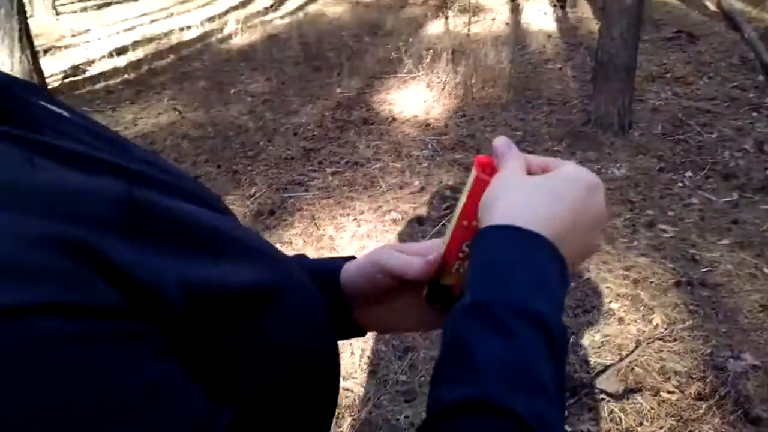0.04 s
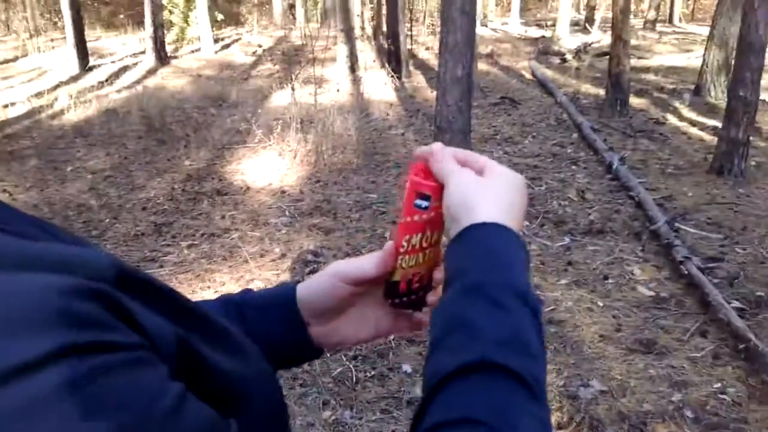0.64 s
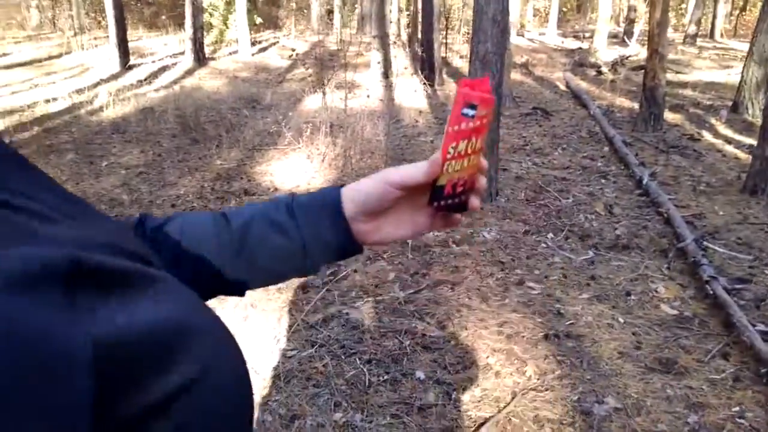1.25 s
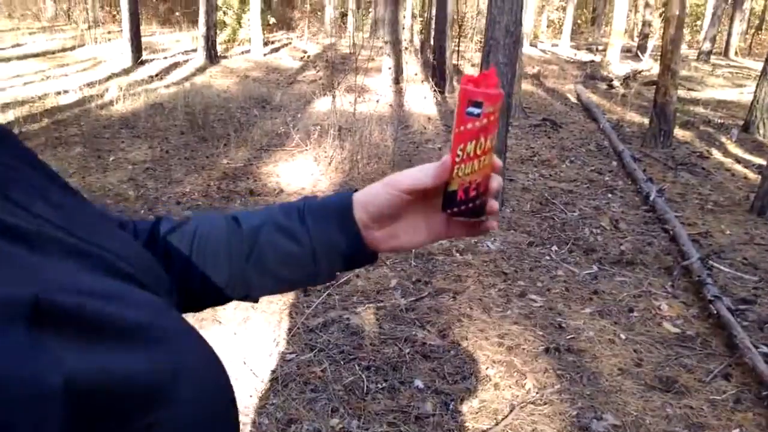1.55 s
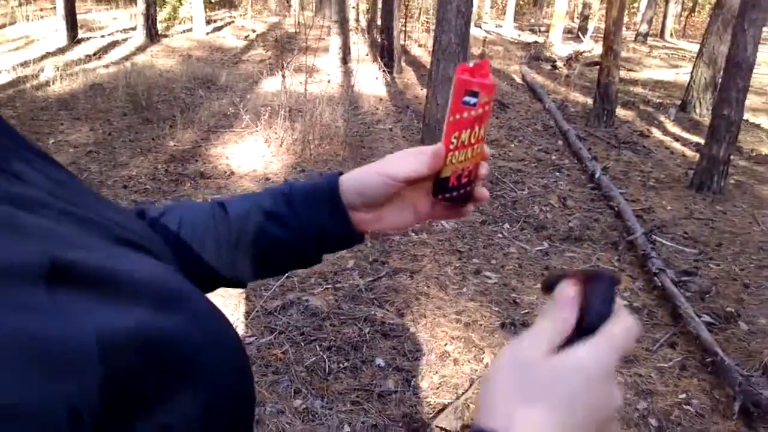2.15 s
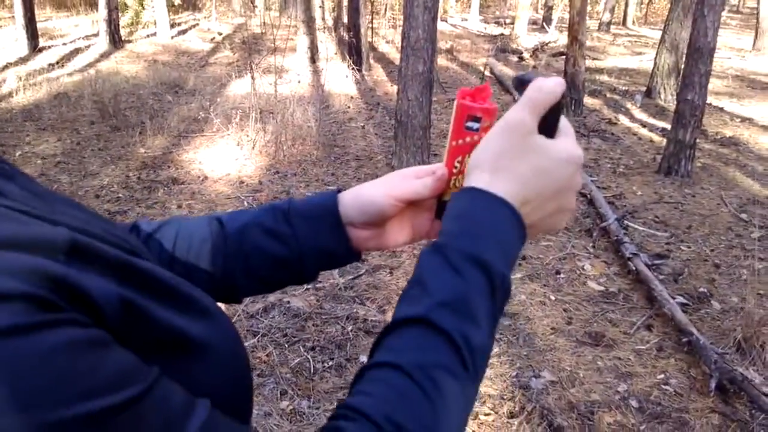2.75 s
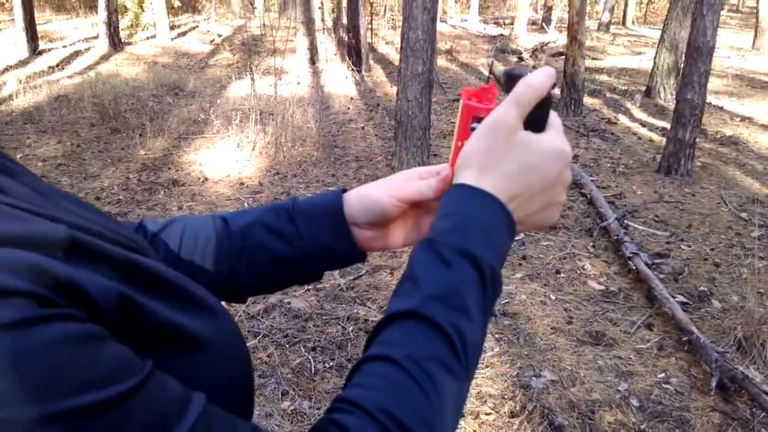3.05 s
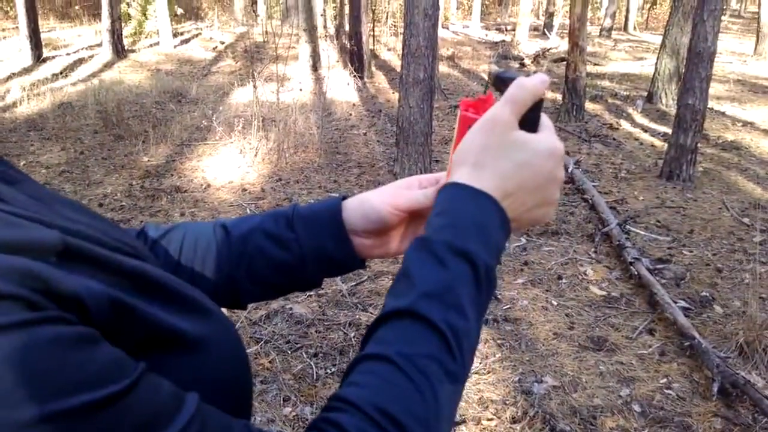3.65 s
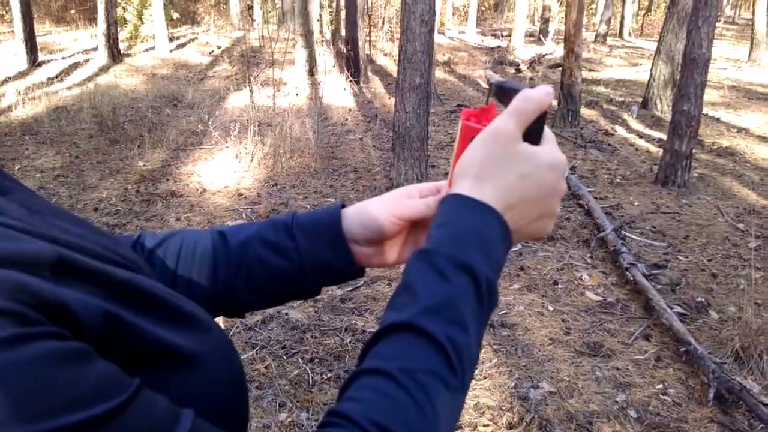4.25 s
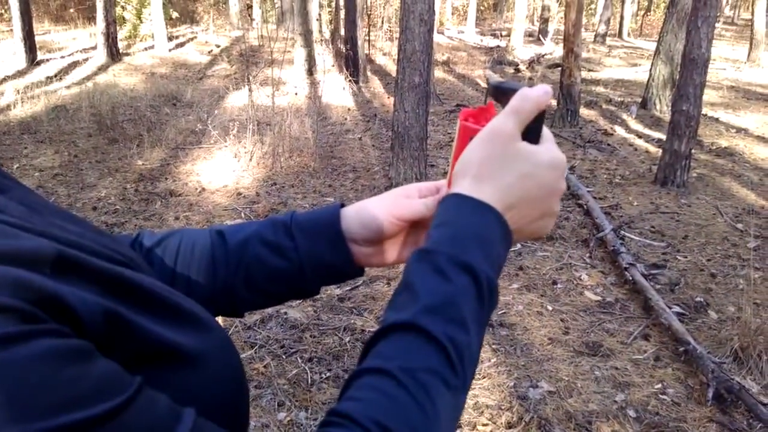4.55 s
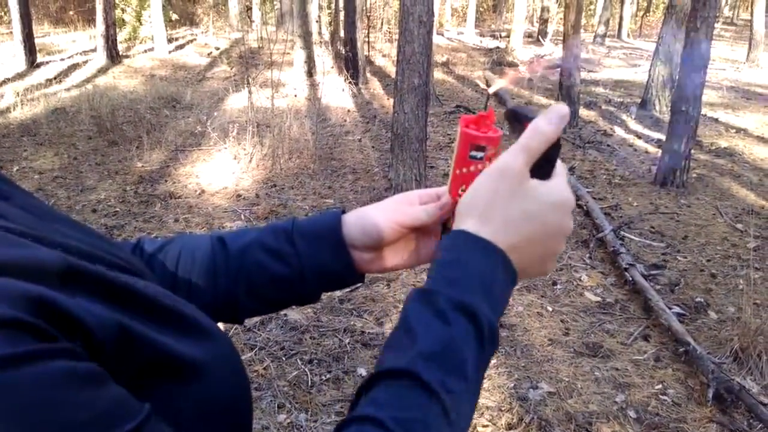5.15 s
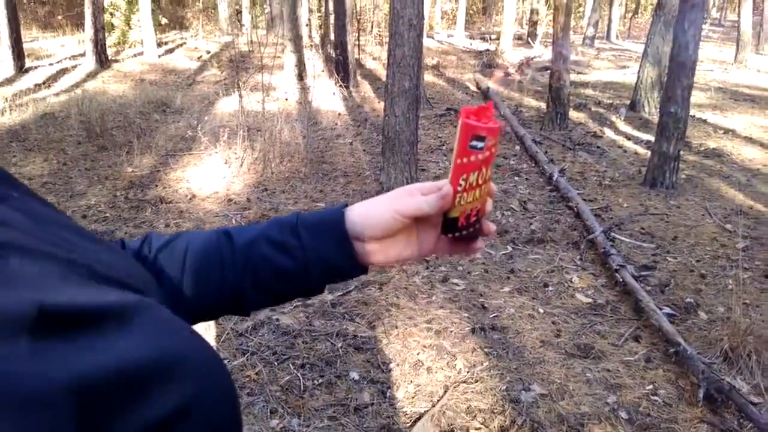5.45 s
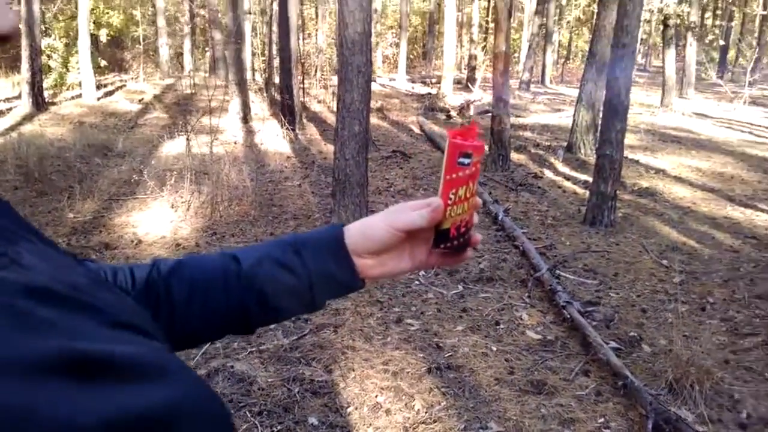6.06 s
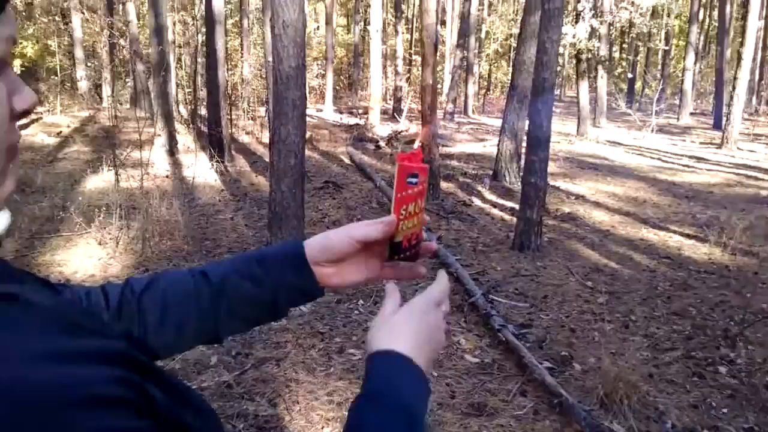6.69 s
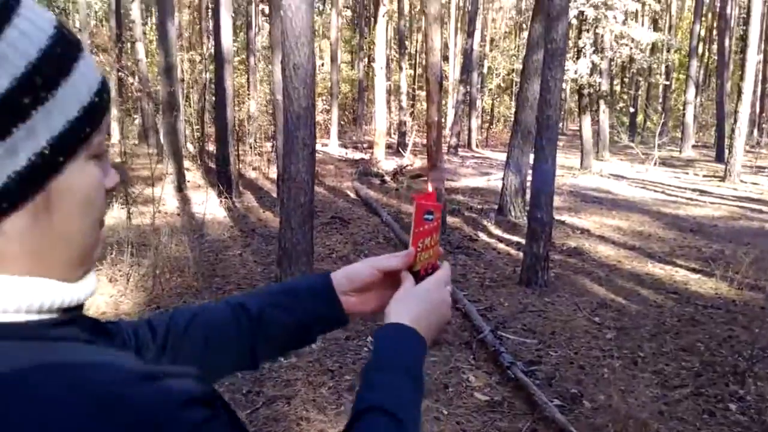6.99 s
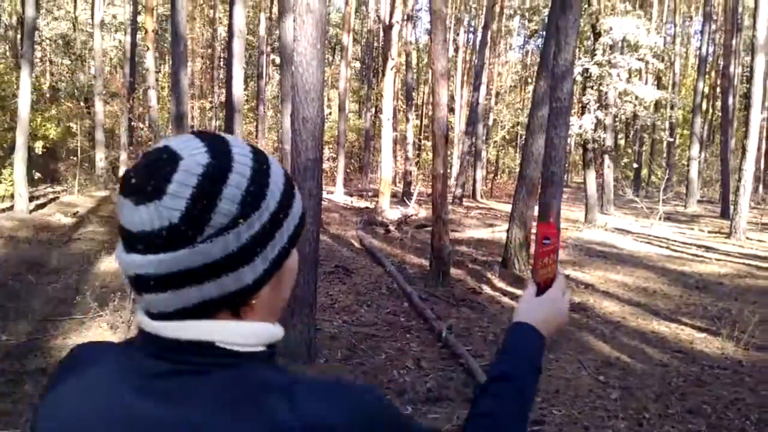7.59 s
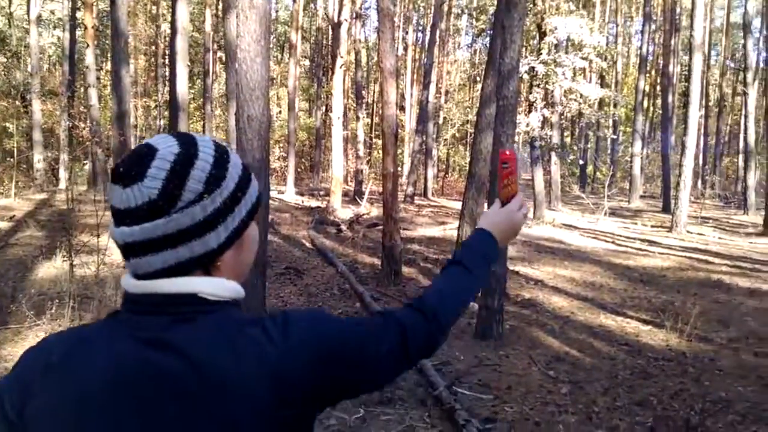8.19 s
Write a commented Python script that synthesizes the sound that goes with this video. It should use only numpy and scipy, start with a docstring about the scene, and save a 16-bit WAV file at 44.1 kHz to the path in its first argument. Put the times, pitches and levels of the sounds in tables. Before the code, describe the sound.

A smoke tube is lit close to the microphone among quiet trees. First come jacket rustle, wrapper crinkles, finger taps on cardboard and low thuds of wind. Two loud lighter clicks follow, then a faint gas flame and a few small spits from the fuse. The tube ignites into a steady rushing hiss, slightly to the right, which shifts in tone and weakens somewhat near the end.

```python
"""Jacket sleeves swish, a wrapper crackles and air buffets the microphone as a cardboard smoke tube
is unwrapped in a quiet pine forest. A piezo lighter snaps twice, its hammer ringing on impact, and
its jet flame blows on the fuse. The tube catches: turbulent gas roars and hisses from the nozzle,
changing colour as it is lifted away. The camera widens its two microphone ports into stereo; its
limiter ducks at the first snap and recovers slowly."""
import sys
import numpy as np
from scipy import signal
from scipy.fft import rfft, irfft, next_fast_len
from scipy.io import wavfile
from scipy.ndimage import uniform_filter1d, minimum_filter1d, map_coordinates

SR = 44100
rng = np.random.default_rng(int(sys.argv[2]) if len(sys.argv) > 2 else 0)


def unload_audio(sound):
    """Save the sound as a 16-bit wav file, at the path given as the first command line argument."""
    columns = np.transpose(np.atleast_2d(sound))
    # keep every value between -1 and 1, then stretch to whole-number steps
    steps = np.round(np.clip(columns, -1, 1) * 32767)
    wavfile.write(sys.argv[1], SR, steps.astype(np.int16))


N = 367353

# Noise spectra. Each row: frequency in Hz, relative spectral density in dB.
FOREST_AIR = [(30, 12.5), (100, -9.5), (250, 4.5), (600, 1), (1000, -7.5), (1500, -13), (2700, -17.5),
              (5000, -16.5), (9000, -19.5), (15500, -21)]
EDDIES = [(15, -7.5), (45, 5), (90, -0.5), (150, -10.5), (250, -20.5), (450, -30.5), (1000, -67.5),
          (3000, -115.5)]
RUB = [(150, 4.5), (400, 6), (750, 4.5), (1200, -2), (1900, -4), (2700, -13.5), (5000, -16.5),
       (10000, -28.5)]  # wrapper and cardboard
NYLON = [(1500, -9.5), (3000, -13.5), (4500, -8), (6500, -7), (8000, -6), (9800, -0.5), (12000, -8),
         (15500, -7)]
CRACK = [(300, -48), (1500, 5), (3000, -12.5), (6000, 2), (10000, 6.5), (15500, -5)]
RATTLE = [(500, -42.5), (1200, -26), (2100, -6.5), (3400, -16.5), (4800, -10), (6200, 0.5), (8000, -4.5),
          (10000, 1.5), (15500, -10.5)]  # the tail of a lighter snap
FLAME_JET = [(100, -20), (260, 4), (600, 8.5), (900, -1), (1300, 5), (1850, 2.5), (2700, -5), (5000, -48.5),
             (10000, -13), (16000, -17.5)]
ROAR = [(100, -8.5), (260, 1), (600, 1.5), (900, 2.5), (1300, 1.5), (1850, 0), (2600, 0.5), (3400, -9),
        (4500, -4.5), (8000, -51)]  # the low part of the smoke jet
HISS = [(2000, -16.5), (3500, -6), (4900, -7), (6300, 0), (8000, 1), (10000, 1.5), (12000, 0.5),
        (13500, -0.5), (15600, -1)]  # its treble, and the fuse
NOZZLE_BEAM = [(3500, -25.5), (4700, -13.5), (6300, -12), (8000, -16.5), (9300, -4.5), (10400, 0),
               (11900, -4.5), (13000, -10), (14700, -12), (17000, -23)]

# Coherence of diffuse sound at the two ports. Each row: frequency in Hz, correlation from 0 to 1.
COHERENCE = [(150, 0.95), (600, 0.3), (1100, 0), (1600, 0.11), (4000, 0.14)]
# Acoustic shadow of the camera body on the left port. Each row: frequency in Hz, gain in dB.
BODY_SHADOW = [(500, 0), (1000, -3), (1900, -4), (3300, -3.5), (6500, -9), (9000, -14), (10700, -17),
               (14000, -15)]
# Long waves creep round the camera and arrive later. Each row: frequency in Hz, extra lag in ms.
CREEP_LAG = [(3500, 0.03), (6500, 0)]
# Stereo widening. Each row: frequency in Hz, share of the opposite port subtracted.
CROSSFEED = [(70, 0.63), (300, 0.71), (1400, 0.39), (2700, 0.94), (4000, 0.85), (5100, 0.46), (7000, 0.2),
             (11000, 0.096), (15000, 0.15)]

# A far hum comes and goes. Each row: time in seconds, level in dB.
HUM_LEVEL = [(0, -58.5), (3.4, -63.5), (4.2, -53.5), (5.0, -53), (8.33, -56)]
# Light draught between gusts. Each row: time in seconds, relative level in dB.
DRAUGHT_LEVEL = [(0, -51), (0.95, -49.5), (1.2, -54.5), (2.0, -53.5), (2.6, -63), (3.4, -65), (4.9, -66),
                 (6.2, -55), (8.33, -51)]
# Gusts on the microphone. Each row: middle in seconds, half length in seconds, relative level in dB.
GUSTS = [(0.218, 0.021, -41), (0.363, 0.031, -39.5), (0.528, 0.15, -36), (0.773, 0.017, -45),
         (0.885, 0.035, -36), (1.013, 0.03, -37), (1.363, 0.025, -47), (1.696, 0.044, -46.5),
         (1.898, 0.022, -39), (1.993, 0.017, -39), (2.19, 0.045, -38), (2.276, 0.028, -33),
         (2.839, 0.06, -42.5), (3.916, 0.058, -50), (4.621, 0.07, -51.5), (5.248, 0.027, -41.5),
         (5.432, 0.1, -44.5), (5.716, 0.16, -45), (6.61, 0.075, -38.5)]
# Thuds of air on the left port. Each row: time in seconds, peak in dB, half length in ms.
AIR_THUDS = [(0.36, -14.5, 1), (0.43, -13, 2.8), (0.486, -10.5, 0.98), (0.5136, -10.5, 0.62),
             (0.525, -7, 1.24), (0.564, -10, 1.43), (0.597, -9.5, 0.9), (0.633, -9, 1.85),
             (0.656, -16, 1.15), (0.778, -19, 1.34), (0.871, -21, 1.8), (0.895, -21.5, 1.4),
             (1.027, -14, 1.43), (1.586, -15.5, 1.28), (1.683, -20, 1.6), (1.809, -21, 3.2),
             (1.894, -16.5, 2.2), (1.938, -20, 2.3), (2.007, -20.5, 1.75), (2.28, -23, 2.4),
             (6.993, -18.5, 0.67)]
# The jacket rustles until the hands hold still.
# Each row: time in seconds, relative levels of rub and swish in dB.
JACKET_RUSTLE = [(0, -59.5, -69), (0.9, -57.5, -60.5), (1.4, -59, -57), (2.45, -55, -56.5),
                 (2.65, -55, -62), (2.89, -67.5, -71), (3.4, -66.5, -75)]
# Strokes of sleeve and wrapper.
# Each row: start and length in seconds, relative levels of rub and swish in dB.
ARM_STROKES = [(-0.02, 0.16, -43.5, -43), (0.146, 0.25, -43.5, -49.5), (0.259, 0.089, -40.5, -46),
               (0.42, 0.33, -49.5, -47.5), (0.703, 0.2, -65, -55), (1.003, 0.12, -62, -51),
               (1.071, 0.052, -40.5, -54), (1.154, 0.054, -41.5, -57.5), (1.226, 0.15, -50.5, -52.5),
               (1.419, 0.33, -51.5, -46), (1.856, 0.21, -48.5, -45.5), (2.17, 0.24, -49, -56)]
# Fingers on cardboard or lighter. Each row: start in seconds, level in dB, pitch in Hz.
FINGER_TAPS = [(0.111, -28, 856), (0.151, -30.5, 1920), (0.17, -27, 910), (0.29, -27.5, 760),
               (0.322, -27, 537), (0.436, -32, 795), (0.558, -23.5, 1600), (1.101, -33, 765),
               (1.177, -28.5, 770), (1.193, -26.5, 720), (1.254, -25.5, 1050), (1.474, -23.5, 1140),
               (1.972, -27.5, 840), (2.36, -33.5, 810), (2.532, -35.5, 716), (2.554, -35, 715),
               (2.661, -32.5, 2090), (2.981, -41, 890), (3.359, -45, 1900), (6.992, -29, 513),
               (7.536, -22, 309), (7.544, -22, 1135)]
# Cracks of wrapper, trigger and burning charge. Each row: start in seconds, relative level in dB.
TICKS = [(0.042, -27), (0.087, -24.5), (0.113, -22.5), (0.146, -26), (0.217, -32), (0.2909, -14.5),
         (0.3213, -24), (0.3297, -20.5), (0.44, -31), (0.5567, -30), (0.651, -26.5), (0.711, -37),
         (0.833, -42), (1.0163, -36.5), (1.263, -31), (1.279, -20.5), (1.363, -34), (1.648, -35),
         (2.2208, -38), (2.38, -30), (2.4388, -24), (2.87, -30.5), (2.96, -38), (2.981, -38), (3.264, -36),
         (3.359, -46), (7.873, -23.5), (8.3049, -19.5)]
# Lighter strike, trigger release, second strike. Each row: start in seconds, peak of the ring in dB,
# then the snap's dull body and the crunch of the spring in dB relative to it.
LIGHTER_SNAPS = [(2.9108, 21, -19, -27), (3.2660, -7, -36, -9), (3.4479, 15, -58, -22)]
# Damped modes. Each row: frequency in Hz, relative level in dB, time to decay by 60 dB in seconds.
HAMMER_MODES = [(1400, -40, 0.005), (2150, -33, 0.009), (3700, -33, 0.004), (6100, -16, 0.005),
                (7300, -15, 0.005), (10350, 0, 0.0036), (11900, -4, 0.003), (13200, -13, 0.003),
                (14800, -15, 0.003)]  # the ring of the lighter's hammer
SNAP_BODY_MODES = [(350, -8, 0.004), (690, -2, 0.003), (1300, -4, 0.003), (2970, -8, 0.005),
                   (3900, -9, 0.004)]  # the dull low and mid crunch of a snap loud enough to overload
# The lighter's gas jet. Each row: time in seconds, level in dB.
FLAME_LEVEL = [(3.43, -79), (3.48, -56), (3.9, -58.5), (4.35, -53.5), (4.7, -56), (4.9, -50.5),
               (5.1, -55.5), (5.3, -44)]
# Soft spits of the fuse. Each row: start in seconds, level in dB.
FUSE_SPITS = [(4.0, -50), (4.366, -51), (4.381, -44), (4.815, -52), (4.863, -46), (4.881, -48.5),
              (4.924, -45), (4.936, -51), (4.963, -48)]
# The tube catches, surges and recedes. Each row: time in seconds, relative roar and hiss in dB.
BURN_LEVELS = [(5.045, -68, -55), (5.1, -49, -42.5), (5.25, -38.5, -35), (5.34, -42.5, -32.5),
               (5.37, -38.5, -32), (5.56, -41, -26.5), (6.1, -39.5, -26), (6.24, -45.5, -33.5),
               (6.35, -37, -27.5), (6.37, -41.5, -23.5), (6.41, -40.5, -28), (6.6, -41, -27.5),
               (6.63, -41.5, -32), (6.77, -41, -28.5), (6.97, -40.5, -34), (7.11, -40.5, -30),
               (7.15, -43, -34), (7.26, -45, -36.5), (7.64, -40.5, -29.5), (7.66, -44.5, -35),
               (7.78, -46, -31.5), (7.84, -51.5, -39), (7.92, -45, -33), (8.15, -48.5, -39),
               (8.28, -49, -41)]
# Lumps of the charge flare up. Each row: start in seconds, change of the hiss in dB.
FLARES = [(5.322, 3), (5.366, 4), (5.438, 3.5), (5.625, 2), (5.778, 0), (6.51, -1.5), (6.795, 0),
          (7.075, 0.5), (7.873, 1), (7.934, 2), (8.304, 9)]
# The moving tube. Each row: time in seconds, lag of the left port in ms, lag of the arm's echo in ms,
# gain of that echo in dB, gain of the nozzle's beam in dB, its pitch ratio, left treble gain in dB.
TUBE_POSE = [(5.1, 0.035, .58, -20, -4, 1.02, 0), (5.4, 0.044, 0.59, -14, 0.5, 1.02, 0),
             (5.75, 0.049, 0.59, -8.5, 3, 1, -1.5), (6.1, 0.049, 0.57, -12, -1, 1.02, -2),
             (6.35, 0.033, 0.54, -9, 3.5, 1.0, -3.5), (6.6, 0.016, 0.56, -10, 6, 0.96, -0.5),
             (7.0, 0.023, 0.48, -18, 5, 1.03, -1.5), (7.3, 0.053, 0.47, -15, 5, 1.1, -1.5),
             (7.65, 0.086, 0.51, -7, -18, 1.1, -4), (8.33, 0.086, 0.5, -8, -8, 0.94, -6)]
# Spectral hollows and ridges that glide as the tube moves.
# Each row: start and end in seconds, first and last centre in Hz, width in Hz, gain in dB.
COLOUR_SWEEPS = [(4.9, 7.5, 870, 980, 75, -8), (4.9, 7.7, 610, 660, 70, 2.5),
                 (4.9, 6.4, 3130, 3680, 110, -14), (6.15, 7.5, 3600, 4520, 140, -13),
                 (4.9, 5.95, 4230, 4480, 130, -12), (7.9, 8.5, 4650, 4250, 130, -5),
                 (4.95, 6.1, 5300, 5600, 300, 4), (6.2, 7.45, 5750, 7400, 240, 6),
                 (4.95, 7.3, 1760, 1900, 100, 2.5), (4.9, 7.5, 7950, 8450, 320, -5),
                 (4.9, 7.0, 12850, 13150, 380, -4)]


def amp(db):
    """Amplitude grows tenfold for every 20 dB."""
    return 10 ** (np.asarray(db) / 20)


def unit(x):
    """Normalisation to an rms of 1."""
    return x / np.sqrt(np.mean(x ** 2) + 1e-20)


def along(points, hz):
    """Interpolation of (Hz, value) points on a logarithmic frequency axis."""
    freqs, values = np.transpose(points)
    return np.interp(np.log(hz + 1), np.log(freqs + 1), values)


def curves(rows):
    """Linear interpolation in time: one value per sample for each column after the first."""
    times, *columns = np.transpose(rows)
    return [np.interp(np.arange(N) / SR, times, column) for column in columns]


def during(rows, fade_s=0.02):
    """A time window: 1 over the span of a table, fading to 0 outside it."""
    t = np.arange(N) / SR
    return np.clip(1 + np.minimum(t - rows[0][0], rows[-1][0] - t) / fade_s, 0, 1)


def swell(start, length, attack_s, release_s):
    """An envelope with linear attack, a hold and exponential decay."""
    t = np.arange(N) / SR - start
    return np.clip(t / attack_s, 0, 1) * np.exp(-np.maximum(t - length, 0) / release_s)


def wobble(rate):
    """Random modulation: a smooth curve through rate knots a second."""
    knots = rng.standard_normal(int(N * rate / SR) + 4)
    return map_coordinates(knots, [np.arange(N) * rate / SR])


def add(track, start, sound):
    """Superposition of a short sound on a track, from start in seconds."""
    part = track[round(start * SR):][:len(sound)]
    part += sound[:len(part)]


def delayed(x, ms):
    """A fixed or gliding delay, by interpolation between samples."""
    return map_coordinates(x, [np.arange(N) - ms * SR / 1000])


def filtered(x, response):
    """Linear filtering: the spectrum is multiplied by a complex frequency response."""
    size = next_fast_len(N + 8192)
    return irfft(rfft(x, size) * response(np.fft.rfftfreq(size, 1 / SR)), size)[..., :N]


def coloured(x, spectrum):
    """Spectral shaping by a curve of (Hz, dB) points."""
    return filtered(x, lambda hz: amp(along(spectrum, hz)))


def dulled(x, edge_hz):
    """Low-pass filtering: the treble rolls off above the edge."""
    return filtered(x, lambda hz: 1 / (1 + (hz / edge_hz) ** 4))


def rush(spectrum):
    """Coloured Gaussian noise of rms 1."""
    return unit(coloured(rng.standard_normal(N), spectrum))


def crackle(spectrum, rate, spread_db):
    """Shot noise of rms 1: impulses of scattered size, on average rate a second."""
    size = amp(spread_db * np.minimum(rng.exponential(size=N), 4))
    sign = np.sign(rng.standard_normal(N))
    occurs = rng.random(N) < rate / SR
    return unit(coloured(size * sign * occurs, spectrum))


def ringing(modes, t):
    """Free vibration: damped modes of alternating sign, struck at t = 0."""
    return sum((-1) ** k * amp(db - 60 * t / t60) * np.cos(2 * np.pi * hz * t)
               for k, (hz, db, t60) in enumerate(modes))


def diffuse(spectrum):
    """A diffuse field is coherent at two nearby ports only at long wavelengths."""
    angle = lambda hz: np.arccos(np.clip(along(COHERENCE, hz), -1, 1)) / 2
    shape = lambda hz: amp(along(spectrum, hz)) * [np.cos(angle(hz)), np.sin(angle(hz))]
    mid, side = filtered(rng.standard_normal((2, N)), shape)
    return unit(np.array([mid + side, mid - side]))


def from_right(x, lag_ms):
    """Diffraction round the camera: sound from the right reaches the left port late and shaded."""
    creep = lambda hz: np.exp(-2j * np.pi * hz * along(CREEP_LAG, hz) / 1000)
    shaded = filtered(x, lambda hz: amp(along(BODY_SHADOW, hz)) * creep(hz))
    return np.array([delayed(shaded, lag_ms), x])


def forest(air_db=-54, hum_hz=113, waver_db=2):
    """Air in the trees forms a diffuse field; a far hum wavers in amplitude and phase."""
    t = np.arange(N) / SR
    hum_gain = amp(curves(HUM_LEVEL)[0] + waver_db * wobble(6))
    hum = hum_gain * np.sin(2 * np.pi * hum_hz * t + wobble(7))
    return amp(air_db + 1.1 * wobble(1)) * diffuse(FOREST_AIR) + hum


def buffeting(gust_db=13.5, draught_db=14, drift_db=3, lump_db=4):
    """Turbulent pressure is local: eddies press on each port separately, the sharpest as thuds."""
    t = np.arange(N) / SR
    gusts = sum(amp(db + gust_db) * np.exp(-((t - middle) / half) ** 2) for middle, half, db in GUSTS)
    draught = amp(curves(DRAUGHT_LEVEL)[0] + draught_db + drift_db * wobble(7.5))
    eddies = np.array([unit(rush(EDDIES) * amp(lump_db * wobble(45))) for port in range(2)])
    thuds = np.zeros(N)
    for middle, db, half_ms in AIR_THUDS:
        u = np.clip((t - middle) * 1000 / half_ms, -8, 8)
        thuds -= amp(db) * u * np.exp((1 - u ** 2) / 2)  # a push, then suction
    return np.hypot(gusts, draught) * eddies + np.array([thuds, np.zeros(N)])


def arm_motion(sag_db_per_s=14):
    """Incoherent sources add in power: strokes and faint rustle give the gains of rub and swish."""
    t = np.arange(N) / SR
    power = (amp(curves(JACKET_RUSTLE)) * during(JACKET_RUSTLE)) ** 2
    for start, length, rub_db, swish_db in ARM_STROKES:
        slowing = amp(-sag_db_per_s * np.clip(t - start, 0, length))
        speed = swell(start, length, attack_s=0.026, release_s=0.036) * slowing
        power += (amp([[rub_db], [swish_db]]) * speed) ** 2
    return np.sqrt(power)


def sleeves(rub_db=-4, grit_db=-3, swish_db=4, crisp_db=-1, scatter_db=-4, crinkle_db=-7.5):
    """Friction noise: nylon swishes and crackles; the rubbed wrapper adds grain and stray crinkles."""
    rub, swish = arm_motion()
    unevenness = amp(1.7 * wobble(55))
    grit = amp(grit_db) * crackle(RUB, rate=300, spread_db=1)
    crinkles = amp(crinkle_db) * crackle(CRACK, rate=110, spread_db=5)
    nylon = amp(swish_db) * rush(NYLON) + amp(crisp_db) * crackle(NYLON, rate=480, spread_db=7.5)
    near = from_right(rub * (grit + crinkles) + swish * unevenness * nylon, lag_ms=0.053)
    around = rub * amp(rub_db) * diffuse(RUB) + swish * amp(scatter_db) * diffuse(NYLON)
    return near + unevenness * around


def taps_and_ticks(tap_t60=0.018, scuff_db=-4, tick_db=8, tick_t60=0.0073):
    """Impulsive excitation: taps ring the damped cardboard with a scuff; ticks are bright cracks."""
    rings, scuffs, ticks = np.zeros((3, N))
    t = np.arange(SR // 12) / SR
    for start, db, hz in FINGER_TAPS:
        decay = amp(db - 60 * t / tap_t60)
        add(rings, start, decay * np.sin(2 * np.pi * hz * t))
        add(scuffs, start, decay * amp(scuff_db))
    for start, db in TICKS:
        add(ticks, start, amp(db + tick_db - 60 * t / tick_t60) / 2)
    return from_right(rings + scuffs * rush(RUB) + ticks * rush(CRACK), lag_ms=0.046)


def lighter(rattle_db=-38, rattle_t60=0.029, crunch_t60=0.011, echo_db=-65, echo_t60=0.46):
    """Impact excites the hammer's modes; the spring crunches, and ground and trunks reflect faintly."""
    snaps, tails = np.zeros((2, N))
    t = np.arange(SR // 4) / SR
    # so small a hammer radiates no bass
    highpass = signal.butter(6, 1200, "highpass", fs=SR, output="sos")
    hammer = signal.sosfilt(highpass, ringing(HAMMER_MODES, t))
    hammer /= np.abs(hammer).max()
    rattle = amp(rattle_db - 60 * t / rattle_t60)
    echo = amp(echo_db - 60 * t / echo_t60)
    for start, db, body_db, crunch_db in LIGHTER_SNAPS:
        crunch = amp(crunch_db - 60 * t / crunch_t60)
        add(snaps, start, amp(db) * (hammer + amp(body_db) * ringing(SNAP_BODY_MODES, t)))
        add(tails, start, amp(db) * (rattle + crunch + echo))
    return from_right(snaps + tails * rush(RATTLE), lag_ms=0.034)


def flame():
    """Jet noise: the lighter's gas blows softly on the fuse."""
    gain = amp(curves(FLAME_LEVEL)[0] + 0.36 * wobble(7.4)) * during(FLAME_LEVEL)
    return from_right(gain * rush(FLAME_JET), lag_ms=0.052)


def fuse(sputter_from_s=4.81, sputter_db=-60, spit_t60=0.03, singe_db=-70):
    """Combustion as shot noise: the fuse crackles in the flame, spits softly and sputters finely."""
    sputter_gain = amp(sputter_db) * swell(sputter_from_s, 0.092, attack_s=0.02, release_s=0.017)
    t = np.arange(SR // 10) / SR
    for start, db in FUSE_SPITS:
        add(sputter_gain, start, amp(db - 60 * t / spit_t60))
    lit_s = FLAME_LEVEL[1][0]
    singe_gain = amp(singe_db) * swell(lit_s, sputter_from_s - lit_s, attack_s=1.16, release_s=0.3)
    singe = singe_gain * crackle(HISS, rate=70, spread_db=4.5)
    sputter = sputter_gain * crackle(HISS, rate=5000, spread_db=6.5)
    return from_right(singe + sputter, lag_ms=0.035)


def phasing(x, fade_s=0.17):
    """Time-varying filtering: narrow hollows and ridges glide through the sound as the tube moves."""
    hz, t, spectra = signal.stft(x, SR, nperseg=1024)
    gain_db = 0
    for start, end, from_hz, to_hz, width_hz, db in COLOUR_SWEEPS:
        centre_hz = np.interp(t, [start, end], [from_hz, to_hz])
        presence = np.clip(np.minimum(t - start, end - t) / fade_s, 0, 1)
        gain_db += db * presence * np.exp(-((hz[:, None] - centre_hz) / width_hz) ** 2 / 2)
    return signal.istft(spectra * amp(gain_db), SR, nperseg=1024)[1][:, :N]


def smoke_tube(surge_db=0.8, sputter_db=1.07, flutter_db=0.65, spit_db=-10,
               roar_gain_db=2.5, hiss_gain_db=4, scatter_roar_db=-5, scatter_hiss_db=-15):
    """Turbulent jet noise: gas rushes from the nozzle; the grainy charge makes it surge and spit."""
    roar_db, hiss_db = curves(BURN_LEVELS) + surge_db * wobble(13)
    lag_ms, echo_ms, echo_db, beam_db, beam_ratio, left_treble_db = curves(TUBE_POSE)
    flare_db = sum(db * swell(start, 0.0027, attack_s=0.002, release_s=0.018) for start, db in FLARES)
    sputter = amp(flare_db + sputter_db * wobble(45) + flutter_db * wobble(260))
    fizz = rush(HISS) + amp(spit_db) * crackle(HISS, rate=1800, spread_db=9)
    # directivity: the bright beam shifts in pitch and strength as the nozzle turns
    facing = amp(beam_db)
    beam = map_coordinates(rush(NOZZLE_BEAM), [np.cumsum(beam_ratio)], mode="mirror")
    hiss = sputter * amp(hiss_db + hiss_gain_db) * (fizz + facing * beam) / np.hypot(1, facing)
    roar = amp(roar_db + roar_gain_db + 1.2 * wobble(35)) * rush(ROAR)
    jet = hiss + roar
    # interference with a dull echo off the arm combs the spectrum
    arm_echo = dulled(amp(echo_db) * delayed(jet, echo_ms), edge_hz=6400)
    left, right = from_right(jet + arm_echo, lag_ms)
    # lifted to the right, the tube hides further behind the camera body
    left_treble = left - dulled(left, edge_hz=1200)
    left = left + (amp(left_treble_db) - 1) * left_treble
    # forest floor and trunks scatter some sound back from all sides
    scattered = amp(roar_db + scatter_roar_db) * diffuse(ROAR)
    scattered += amp(hiss_db + scatter_hiss_db) * diffuse(HISS)
    ignition = swell(BURN_LEVELS[0][0], N / SR, attack_s=0.012, release_s=1)
    return phasing(np.array([left, right]) + scattered) * ignition


def scene():
    """Superposition: the pressures of all sources add at the two microphone ports."""
    return (forest() + buffeting() + sleeves() + taps_and_ticks()
            + lighter() + flame() + fuse() + smoke_tube())


def widen(ports, travel_ms=0.3808):
    """A differential array: each channel subtracts part of the other port, delayed by the travel time."""
    delay = lambda hz: np.exp(-2j * np.pi * hz * travel_ms / 1000)
    return ports - filtered(ports[::-1], lambda hz: np.clip(along(CROSSFEED, hz), 0, 1) * delay(hz))


def limiter(x, ceiling_db=-2.5, release_db_per_s=6):
    """Automatic gain control: the gain drops at once for a loud peak and climbs back slowly."""
    power = np.abs(uniform_filter1d(np.max(x ** 2, axis=0), size=44))
    needed_db = np.minimum(0, ceiling_db - 10 * np.log10(power + 1e-12))
    held_db = minimum_filter1d(needed_db, size=180)
    climb_db = release_db_per_s * np.arange(N) / SR
    gain_db = np.minimum.accumulate(held_db - climb_db) + climb_db
    return x * amp(uniform_filter1d(gain_db, size=120))


def record(dry, top_hz=15650):
    """The signal chain: stereo widening, limiting, full-scale clipping and a steep band limit."""
    clipped = np.clip(limiter(widen(dry)), -1, 1)
    return filtered(clipped, lambda hz: 1 / (1 + (hz / top_hz) ** 120))


dry = scene()
out = record(dry)
unload_audio(out)
```